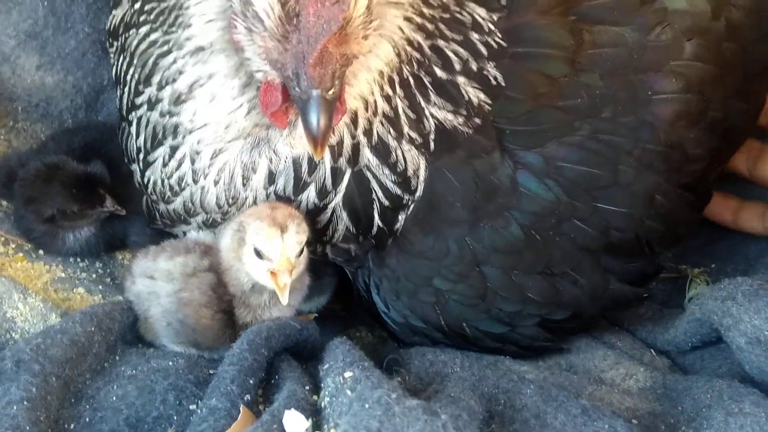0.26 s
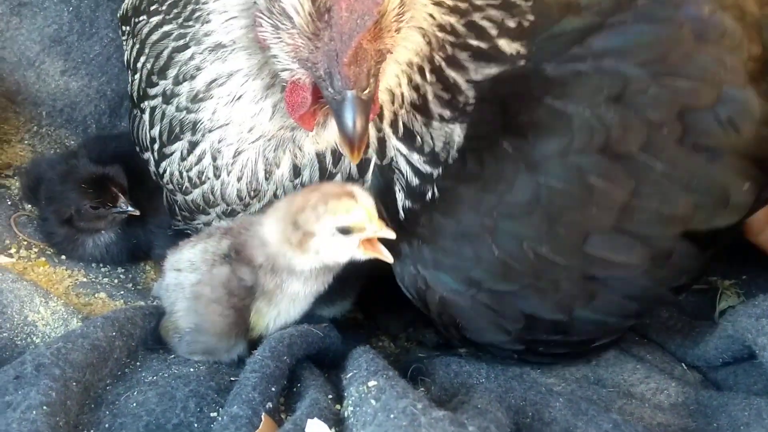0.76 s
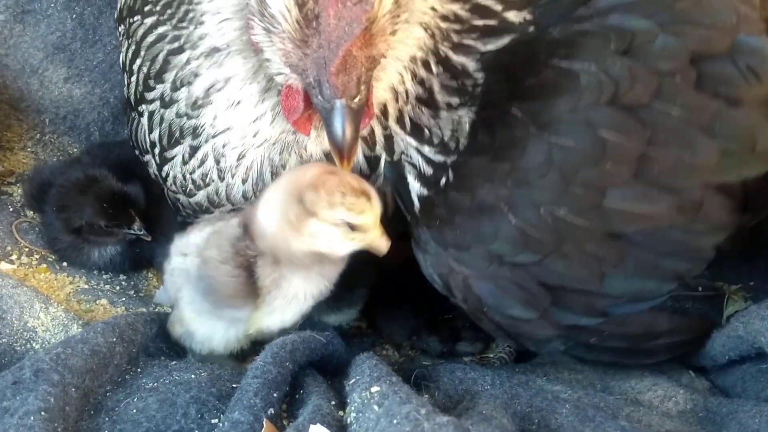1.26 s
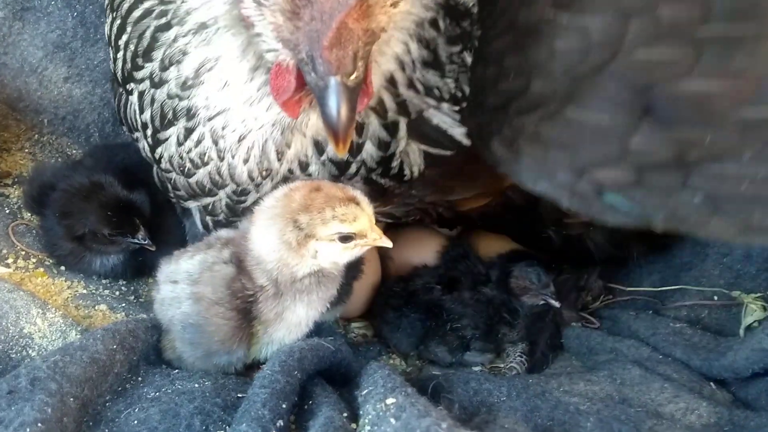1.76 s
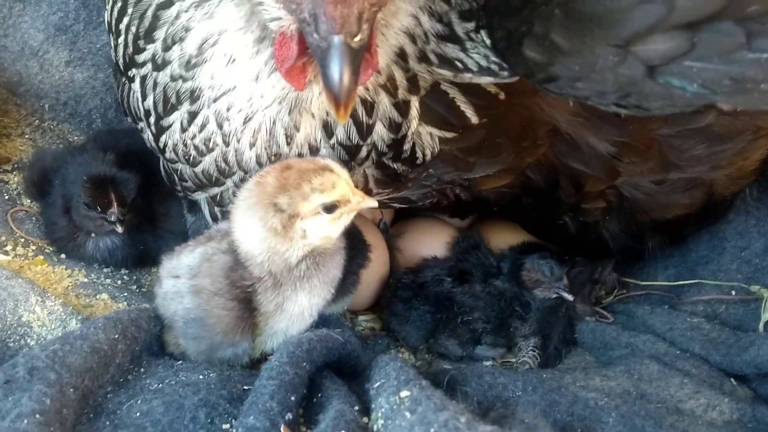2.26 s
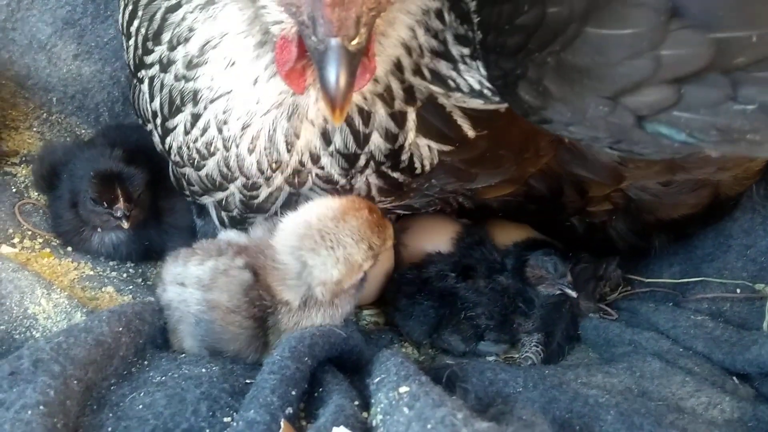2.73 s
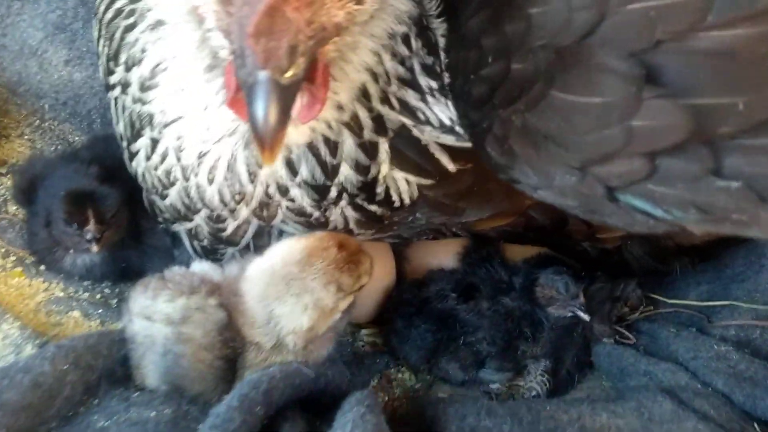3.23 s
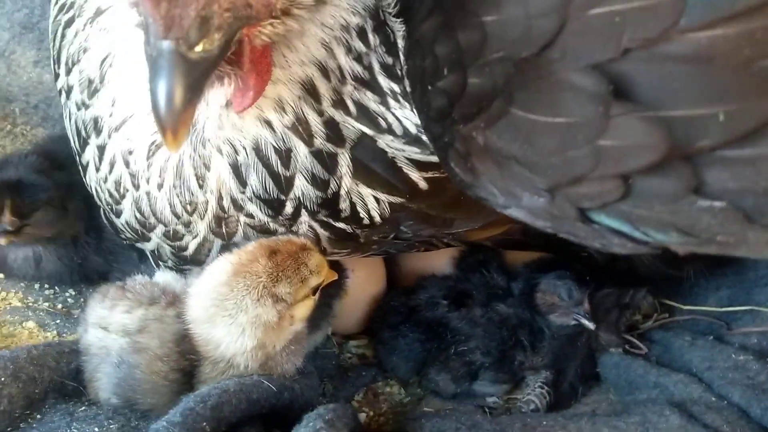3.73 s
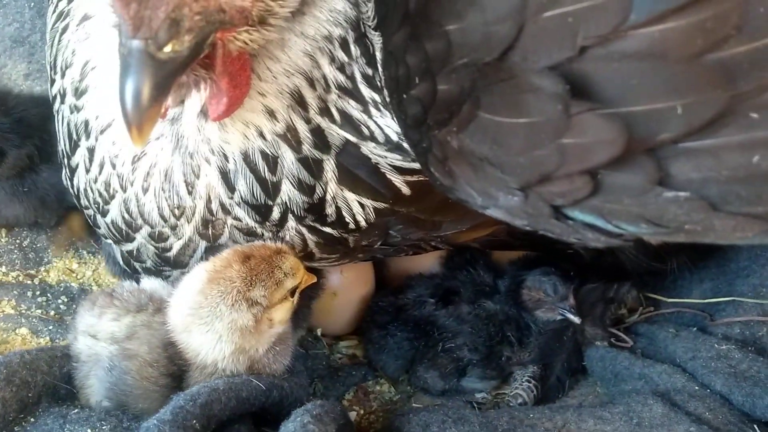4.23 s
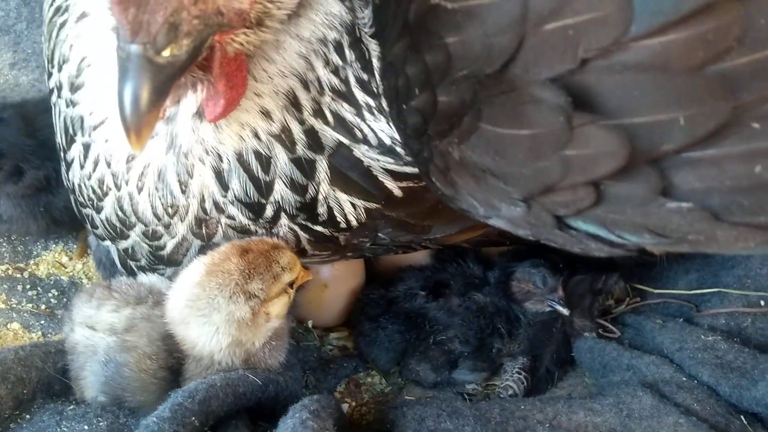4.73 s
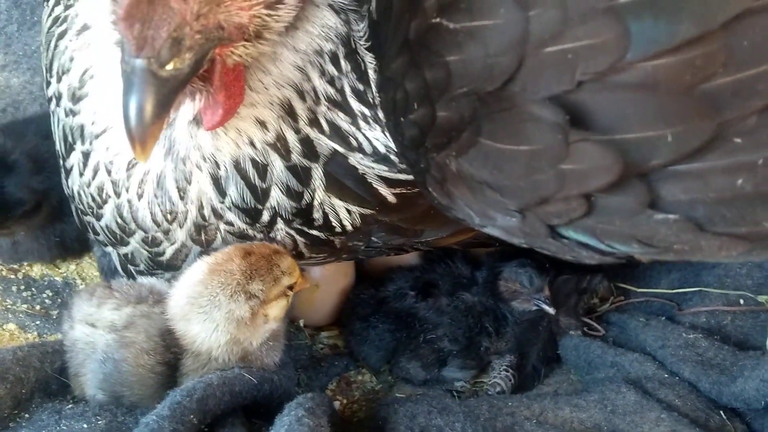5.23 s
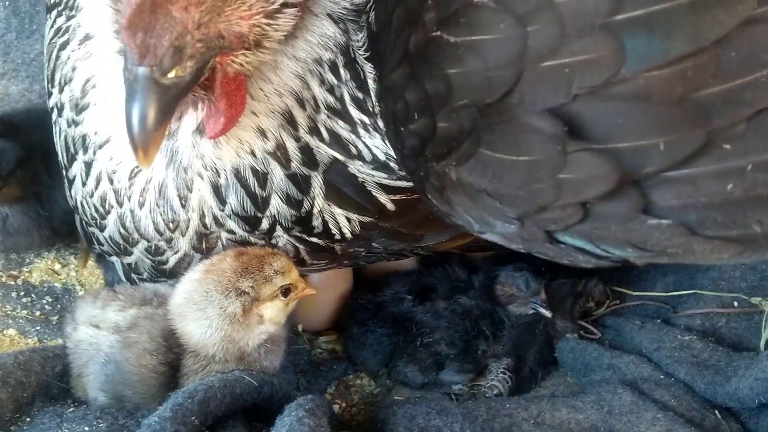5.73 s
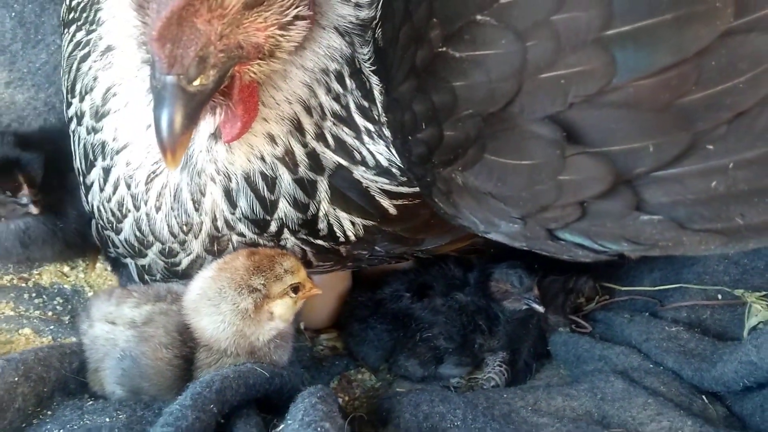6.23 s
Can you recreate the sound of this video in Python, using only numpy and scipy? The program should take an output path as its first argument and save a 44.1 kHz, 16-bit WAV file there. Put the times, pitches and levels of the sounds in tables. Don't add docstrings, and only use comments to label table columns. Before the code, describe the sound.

A hen growls five times very close to a phone in a quiet shed. Each growl is a rough, throaty, mid-pitched rattle fluttering about fifty times a second. Soft throat clicks precede the later ones, and sputters end most of them. Between them come feather rustles, small ticks, a few tiny chick peeps, barely audible bird coos, a thin cricket trill and faint airy rumble.

```python
import sys
import numpy as np
from scipy import signal
from scipy.fft import rfft, irfft
from scipy.io import wavfile
from scipy.ndimage import uniform_filter1d

SR = 44100
rng = np.random.default_rng(int(sys.argv[2]) if len(sys.argv) > 2 else 0)


def linear_from_db(decibels):
    return 10 ** (np.asarray(decibels, float) / 20)


def generate_wav(sig):
    pcm = np.round(np.clip(np.atleast_2d(sig).T, -1, 1) * 32767).astype(np.int16)
    wavfile.write(sys.argv[1], SR, pcm)


N = 285768

SLACK_HZ = 852.3


def level(x, db):
    return x * linear_from_db(db) / np.sqrt(np.mean(x ** 2))


def colour(x, points):
    hz, db = np.transpose(points)
    grid_hz = np.maximum(np.arange(2049) * SR / 4096, 1)
    log_gain = np.interp(np.log(grid_hz), np.log(hz), db) * np.log(10) / 20
    ceps = irfft(log_gain)
    ceps[1:2048] *= 2
    ceps[2049:] = 0
    response = irfft(np.exp(rfft(ceps)))
    led_in = np.r_[x[4096:0:-1], x]
    return signal.fftconvolve(led_in, response)[4096:N + 4096]


def band(x, hz, width):
    sos = signal.butter(2, [hz - width / 2, hz + width / 2], "band", fs=SR, output="sos")
    return signal.sosfilt(sos, x)


def walk(rate_hz):
    hold = max(int(SR / rate_hz), 1)
    steps = np.repeat(rng.standard_normal(N // hold + 1), hold)
    return 1.3 * uniform_filter1d(uniform_filter1d(steps, hold), hold)[:N]


def span(table):
    s, *columns = np.transpose(table)
    at = slice(int(s[0] * SR), min(int(s[-1] * SR), N))
    t = np.arange(at.start, at.stop) / SR
    return at, [np.interp(t, s, c) for c in columns]


def stereo(mid, side):
    return np.array([mid + side, mid - side])


def whistles(tables, pan_db):
    out = np.zeros(N)
    for table in tables:
        at, (hz, db) = span(table)
        tone = np.sin(2 * np.pi * np.cumsum(hz) / SR)
        out[at] += np.sqrt(2) * linear_from_db(db) * signal.windows.tukey(len(hz), .3) * tone
    return out * linear_from_db(np.array([[pan_db], [-pan_db]]) / 2)


def shed():
    # frequency in Hz, level in dB
    mid_points = [(15, -54), (25, -24.5), (80, -2), (170, -4.5), (346, -10), (600, -7.5), (1570, -16),
                  (2460, -23), (3660, -21), (14200, -34)]
    # frequency in Hz, level in dB
    side_points = [(15, -60.5), (25, -25.5), (51, 3.5), (82, -3.5), (193, -7.5), (364, -21.5), (463, -16),
                   (636, -21.5), (807, -24.5), (874, -31), (1110, -37), (2660, -24), (4290, -32.5),
                   (12700, -42.5), (14200, -43.5)]
    mid = level(colour(rng.standard_normal(N), mid_points), -57.5) * linear_from_db(.8 * walk(5))
    side = level(colour(rng.standard_normal(N), side_points), -52) * linear_from_db(.8 * walk(4))
    return stereo(mid, side - .1 * mid)


def membrane(hz, pressed=0.59):
    overtones_db = [2.5, 2, -2.5, -17.5, -15.5, -18.5]
    phase = 2 * np.pi * np.cumsum(hz) / SR
    out = linear_from_db(overtones_db[0]) * np.cos(phase)
    for k, db in enumerate(overtones_db[1:], 2):
        out += linear_from_db(db) * pressed * np.cos(k * phase)
    return out


def growls(shake):
    # time in seconds, level in dB, lowest pitch in Hz,
    # highest pitch in Hz, dwell at the low end (1 none, 3 long)
    efforts = [
        [(0, -16.5, 499.3, 900, 0.81), (.15, -16.5, 486.6, 890, 0.75), (.22, -17.5, 441, 880, 2.29),
         (.34, -19, 393.7, 687, 2.96)],
        [(.903, -19, 437.5, 860, 2.27), (1.2, -20.5, 440, 859, 2.98), (1.345, -19, 425, 806, 2.78)],
        [(1.783, -19, 419.2, 951, 1.3), (1.9, -18.5, 459, 779, 1.8), (2.17, -19, 459, 760, 2.1),
         (2.3, -16.5, 459, 760, 2.67), (2.548, -18, 401.4, 745, 2.92)],
        [(3.441, -19, 496.3, 1060, 1.9), (3.67, -17.5, 485, 1020, 1.8), (3.77, -17.5, 450, 900, 1.07),
         (4.12, -16, 447.3, 840, 1.17), (4.22, -23, 382, 715, 2.5)],
        [(5.428, -21, 469.9, 950, 1.09), (5.66, -20, 461.5, 900, 1.13)],
    ]
    # time of a snap in seconds, flutter rate there in Hz, slowing in Hz per s
    flutters = [
        (.018, 51.93, 24.5),
        (.906, 48.99, 10.0),
        (1.796, 49.15, 4.76),
        (3.4617, 54.31, 11.96),
        (5.448, 50.94, 18.9),
    ]
    # left minus right in dB, open-beak treble in dB, beak opening in dB per s,
    # gape in dB, snap in dB
    heads = [
        (1.5, -54.5, -2, -2, -2),
        (1.5, -54, -2.5, -3, 0),
        (2, -53.5, -2.5, -2, -1),
        (3.5, -45.5, 6, -3.5, -3.5),
        (3, -43.5, 1, -8, 1),
    ]
    # start in seconds, end in seconds
    stalls = [
        (.213, .219),
        (1.039, 1.047),
        (1.169, 1.177),
        (1.277, 1.282),
        (1.955, 1.96),
        (2.266, 2.27),
        (2.459, 2.467),
        (5.435, 5.439),
        (5.451, 5.46),
        (5.491, 5.497),
    ]
    attack_s = 0.0072
    source, gain, upper_db = np.zeros(N), np.zeros(N), np.zeros(N)
    pan_db, treble_db = np.full(N, 3.), np.full(N, -60.)
    tremble, clock = walk(300), np.arange(N) / SR
    rows = np.vstack(efforts)
    s, level_db, low_hz, high_hz, dwell = (np.interp(clock, rows[:, 0], c) for c in rows.T)
    taut_hz = np.maximum(high_hz - SLACK_HZ, 0)
    rough = np.maximum(.15 - .00055 * taut_hz, .045)
    for table, (snap_s, rate_hz, slowing), (pan, treble, opening, gape, snap_db) in zip(efforts, flutters, heads):
        at = slice(max(int((table[0][0] - .004) * SR), 0), int((table[-1][0] + .002) * SR))
        since_s = clock[at] - snap_s
        turns = 5 + (rate_hz - slowing / 2 * since_s) * since_s
        chance = rng.standard_normal((64, 4))
        low, high, skew, size = (np.interp(turns, np.arange(64), c) for c in chance.T)
        turns = turns + 0.1197 + .3 * rough[at] * skew
        bent = 2 * np.pi * turns + np.pi - .45 * np.cos(2 * np.pi * turns)
        tension = ((1 + np.cos(bent)) / 2) ** dwell[at]
        pressed = np.clip(.58 + .32 * (dwell[at] - 1), .5, .92)
        leap = np.exp(-((turns % 1 - .36) / 0.052) ** 2)
        off_snap = turns - np.round(turns)
        snap = np.exp(-(off_snap / .022) ** 2)
        bottom = np.log(low_hz[at]) + .6 * rough[at] * low
        top = np.log(high_hz[at]) + 0.608 * rough[at] * high
        plunge = 1.8 * rough[at] * np.exp(-(off_snap / .08) ** 2) * (1 + .4 * size)
        hz = np.exp(bottom + tension * (top - bottom) - plunge + 0.825 * rough[at] * shake[at])
        swell_db = pressed * (-1.5 * np.cos(bent - .4) - 10 * leap) + 9 * rough[at] * tremble[at]
        slap_db = snap_db + 0.01 * taut_hz[at] + 1.5 * size
        slap = 4.8 * (snap - uniform_filter1d(snap, size=95)) * linear_from_db(slap_db)
        source[at] = membrane(hz, pressed) * linear_from_db(swell_db) - slap
        attack = np.clip((clock[at] - at.start / SR) / attack_s + (at.start == 0), 0, 1)
        gain[at] = linear_from_db(level_db[at]) * attack
        treble_db[at] = np.minimum(treble + opening * since_s, -36)
        upper_db[at] = gape + 0.0519 * (high_hz[at] - SLACK_HZ)
        pan_db[at.start:at.stop + 2500] = pan
    for start, stop in stalls:
        gain[int(start * SR):int(stop * SR)] *= linear_from_db(-22)
    return source, gain, pan_db, treble_db, upper_db


def add_sputters(source, gain, shake):
    # start in seconds, peak in dB, decay in seconds, pitch in Hz
    sputters = [
        (0.359, -27.5, 0.0029, 392),
        (1.357, -20, 0.0059, 373),
        (2.562, -13, 0.0054, 338),
        (4.229, -14, 0.0086, 302.6),
        (5.674, -18.5, 0.0065, 456),
    ]
    t = np.arange(1800) / SR
    for s, db, decay_s, hz in sputters:
        at = slice(int(s * SR), int(s * SR) + 1800)
        source[at] = membrane(hz * np.exp(0.19 * shake[at] - 8 * t))
        gain[at] = linear_from_db(db) * np.exp(-(t / decay_s) ** 2 / 2)


def beak_buzz(source, gain, treble_db):
    # resonance in Hz, width in Hz, level in dB
    resonances = [(3150, 380, 2), (3800, 230, -4.5), (4240, 220, -0.5)]
    buzz = np.maximum(source, 0) ** 2 * rng.standard_normal(N)
    beak = sum(linear_from_db(db) * band(buzz, hz, width) for hz, width, db in resonances)
    return beak * gain * linear_from_db(treble_db + 1.0) / np.std(beak[treble_db > -60])


def add_clicks(source, pan_db, scale):
    # time in seconds, peak in dB, left minus right in dB
    clicks = [
        (0.864, -25, 2),
        (1.736, -27, 1.5),
        (3.398, -23, 3.5),
        (5.393, -23.5, 3.5),
    ]
    push = signal.windows.hann(45)
    for s, db, pan in clicks:
        i = int(s * SR) + 150
        source[i:i + 45] += linear_from_db(db + 9.5) * scale * push
        pan_db[i:i + 600] = pan


def nest_tail(voice):
    t60_s, wall_t60_s, tail_db = .07, 0.35, -25
    t = np.arange(int(.25 * SR)) / SR
    decay = linear_from_db(-60 * t / t60_s) + linear_from_db(-19 - 60 * t / wall_t60_s)
    tail = rng.standard_normal((2, len(t))) * decay * (t > .003)
    tail *= linear_from_db(tail_db) / np.sqrt(np.sum(tail ** 2, axis=1, keepdims=True))
    return signal.fftconvolve(voice, tail, axes=1)[:, :N]


def hen():
    # frequency in Hz, gain in dB
    throat = [(35, -68), (70, -46.5), (165, -10), (215, -15), (280, -9.5), (400, -11), (505, -1), (660, -4),
              (860, -0.5), (1040, -9.5), (1190, -20.5), (1330, -17), (1500, -24.5), (1640, -29),
              (2300, -65), (5000, -91.5)]
    # frequency in Hz, gain in dB
    throat_side = [(35, -50.5), (60, -23.5), (200, -13), (460, -9), (617, -11), (790, -4.5), (1240, -31.5),
                   (1440, -18.5), (2060, -31.5), (2400, -24.5), (3120, -61), (5280, -120)]
    shake = walk(500)
    source, gain, pan_db, treble_db, upper_db = growls(shake)
    scale = 1 / np.std(colour(source, throat)[gain > 0])
    add_sputters(source, gain, shake)
    gain = uniform_filter1d(gain, size=60)
    beak = beak_buzz(source, gain, treble_db)
    source *= gain * scale
    add_clicks(source, pan_db, scale)
    lean = np.tanh(pan_db * np.log(10) / 40) / .25
    high = signal.sosfiltfilt(signal.butter(4, 1200, "high", fs=SR, output="sos"), source)
    source += (linear_from_db(upper_db) - 1) * high
    mid = colour(source, throat) + beak
    side = colour(source * lean, throat_side) + .6 * beak
    voice = stereo(mid, side)
    return voice + nest_tail(voice)


def cricket():
    trills_s = [.6, .98, 1.8, 2.13, 2.52, 3.15, 3.75, 4.37, 4.76, 5.259, 5.53, 6.05, 6.39]
    hold_s, fall_db_per_s, rest_db = 0.062, 69, -9
    away_s = np.min(np.abs(np.arange(N) / SR - np.array(trills_s)[:, None]), axis=0)
    db = -70 + np.clip(-fall_db_per_s * (away_s - hold_s), rest_db, 0)
    tone = level(band(rng.standard_normal(N), 3660, 60), -1.4) * linear_from_db(db + 2.7 * walk(40))
    return stereo(tone, .2 * tone)


def rustle():
    # time in seconds, peak in dB, fall to either side in dB per s
    shifts = [(.02, -63, 251), (.26, -62, 134), (.37, -62.5, 152), (0.481, -51.5, 128), (0.751, -51.5, 248),
              (.98, -57.5, 111), (1.18, -59.5, 298), (1.27, -58.5, 204), (1.52, -62.5, 29),
              (1.79, -53.5, 192), (1.931, -61, 80), (2.17, -62.5, 144.5), (3.14, -53.5, 139.5),
              (3.24, -59, 128.5), (3.44, -64, 57), (4.38, -70, 62), (5.54, -72, 27.5), (5.76, -67.5, 102),
              (6.46, -68.5, 20)]
    # frequency in Hz, level in dB
    cloth = [(3120, -35.5), (5300, -11.5), (6430, 2), (7870, -9.5), (9200, -7.5), (11700, -5.5),
             (14200, -19.5)]
    # time in seconds, peak in dB, frequency in Hz
    ticks = [
        (.2574, -52, 11020),
        (.5014, -42, 5990),
        (.5506, -43, 2600),
        (1.298, -47, 4790),
        (1.777, -50, 4010),
        (3.236, -53.5, 7040),
        (5.7688, -54, 6000),
    ]
    # time in seconds, peak in dB
    bumps = [
        (2.12, -27.5),
    ]
    t = np.arange(N) / SR
    fidget_db = -64 - 2.1 * t
    db = np.max([fidget_db] + [peak_db - fall * np.abs(t - s) for s, peak_db, fall in shifts], axis=0)
    grains = rng.standard_normal((3, N)) * linear_from_db(2.2 * rng.exponential(size=(3, N)))
    mid, side = np.zeros(N), np.zeros(N)
    for out, grain in zip((mid, side), grains):
        hiss = level(colour(grain, cloth), 0)
        for hz in (5000, 8800, 12600):
            out += band(hiss, hz, 4200) * linear_from_db(db + 4.6 + 2.2 * walk(60) + .8 * walk(15))
    mid += level(band(grains[2], 3600, 4100), -2.5) * linear_from_db(db - 1.5 + 2.0 * walk(60))
    t = np.arange(300) / SR
    for s, tick_db, hz in ticks:
        burst = rng.standard_normal(300) * np.exp(-t / .0015)
        mid[int(s * SR):int(s * SR) + 300] += linear_from_db(tick_db) * band(burst, hz, .5 * hz)
    t = np.arange(2000) / SR
    for s, bump_db in bumps:
        bump = linear_from_db(bump_db - 3.5) * np.sin(2 * np.pi * 110 * t) * t / 0.002 * np.exp(-t / .004)
        mid[int(s * SR):int(s * SR) + 2000] += bump
        side[int(s * SR):int(s * SR) + 2000] += 1.5 * bump
    return stereo(mid, .7 * side - 0.6 * mid)


def slumps():
    # time in seconds, peak in dB, frequency in Hz, decay in seconds
    pops = [
        (0.368, -48.5, 199, 0.011),
        (0.878, -43, 229, 0.007),
        (1.34, -34, 179, 0.013),
        (1.371, -47, 175, 0.012),
        (2.575, -51, 192, 0.0071),
        (3.402, -41.5, 159, 0.015),
        (3.439, -39.5, 152.3, 0.0067),
        (4.242, -42, 200, 0.0091),
        (4.258, -47, 192, 0.0092),
        (5.4, -44, 213, 0.0093),
    ]
    out, t = np.zeros(N), np.arange(4000) / SR
    for s, db, hz, decay_s in pops:
        swell = t / decay_s * np.exp(-2 * t / decay_s)
        out[int(s * SR):int(s * SR) + 4000] += linear_from_db(db + 16) * swell * np.sin(2 * np.pi * hz * t)
    return stereo(out, .6 * out)


def squeaks():
    # time in seconds, pitch in Hz, level in dB
    glides = [
        [(1.757, 960, -47), (1.763, 1116, -40), (1.771, 1290, -50), (1.78, 946, -36), (1.784, 800, -70.5)],
        [(1.38, 795, -55), (1.41, 960, -60), (1.44, 880, -53)],
    ]
    return whistles(glides, 2.5)


def chick_peeps():
    # time in seconds, pitch in Hz, level in dB
    peeps = [
        [(1.524, 2530, -43), (1.53, 3010, -56), (1.536, 3360, -50), (1.55, 3280, -65)],
        [(2.146, 2961, -61), (2.163, 2680, -42), (2.172, 2930, -49), (2.18, 3380, -56)],
        [(4.359, 3400, -42), (4.372, 3150, -43.5), (4.38, 3600, -46.5), (4.386, 4110, -59), (4.394, 4600, -64)],
    ]
    return whistles(peeps, -1.5)


def far_birds():
    # start in seconds, length in seconds, first pitch in Hz, last pitch in Hz, level in dB
    coos = [(2.759, 0.092, 628, 564, -70), (2.9, 0.082, 476, 451, -71), (3.111, 0.13, 544, 662, -67.5),
            (3.128, 0.071, 412, 417, -74), (4.33, 0.12, 555, 516, -69), (4.74, 0.097, 463, 463, -66.5),
            (4.773, 0.082, 555, 683, -69), (4.858, 0.068, 652, 642, -70), (4.981, 0.061, 747, 785, -72),
            (4.999, .1, 430, 477, -71), (5.265, 0.115, 538, 693, -67), (5.846, 0.055, 636, 633, -61.5),
            (5.964, .09, 760, 774, -72), (6.18, 0.14, 450, 434, -74.5), (6.29, 0.18, 620, 617, -66)]
    notes = []
    for s, length_s, first_hz, last_hz, db in coos:
        middle = (s + .4 * length_s, (first_hz + last_hz) / 2, db)
        notes.append([(s, first_hz, db - 4), middle, (s + length_s, last_hz, db - 3)])
    return whistles(notes, -5) * linear_from_db(5.5 + 1.5 * walk(30))


def chest_hum():
    # time in seconds, pitch in Hz, level in dB
    hums = [
        [(3.46, 161, -50.5), (3.792, 152.5, -54.5), (3.84, 174, -48), (3.9, 166, -57)],
    ]
    return whistles(hums, 3)


def scene():
    body = hen() + slumps() + squeaks() + chest_hum()
    around = chick_peeps() + far_birds() + cricket() + rustle() + shed()
    return body + around


def roll_off(x):
    return signal.sosfilt(signal.butter(12, 14320, fs=SR, output="sos"), x)


def record(dry):
    # frequency in Hz, width in Hz, depth in dB
    notches = [(2480, 410, -6.5), (5040, 540, -4), (7600, 600, -3), (9800, 310, -3)]
    # low edge in Hz, high edge in Hz, readiness to mute
    mutes = [(2150, 2350, -.2), (2350, 2600, .9), (2600, 2780, .1), (4800, 5200, -.1), (7300, 7800, -1.7),
             (9900, 10400, -1.3)]
    mid, side = (dry[0] + dry[1]) / 2, (dry[0] - dry[1]) / 2
    for hz, width, db in notches:
        mid = colour(mid, [(20, 0), (hz - width, 0), (hz - width / 3, db), (hz + width / 3, db), (hz + width, 0)])
    bin_hz, spectrum = np.arange(N + 1) * SR / (2 * N), rfft(mid, 2 * N)
    busy = uniform_filter1d(np.abs(mid), size=2000) > .01
    for low_hz, high_hz, ready in mutes:
        part = irfft(spectrum * (bin_hz >= low_hz) * (bin_hz < high_hz))[:N]
        faint = uniform_filter1d(np.abs(part), size=900) < linear_from_db(-66)
        shut = faint & (walk(14) + 1.2 * busy * (low_hz < 3000) > -ready)
        mid = mid - uniform_filter1d(1. * shut, size=600) * part
    low_pass = signal.ellip(8, .2, 60, 14300, fs=SR, output="sos")
    dull = signal.sosfilt(low_pass, stereo(mid, side))
    return roll_off(dull)


dry = scene()
out = record(dry)
generate_wav(out)
```